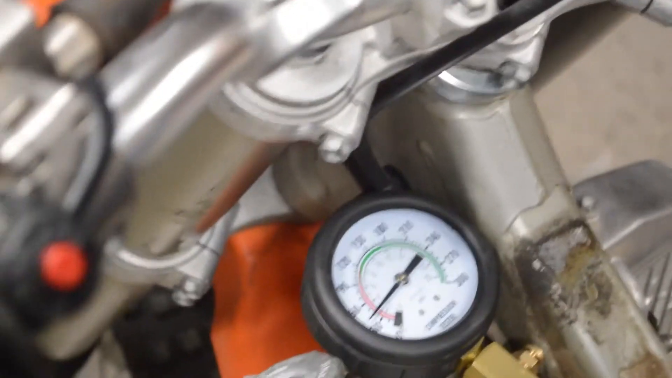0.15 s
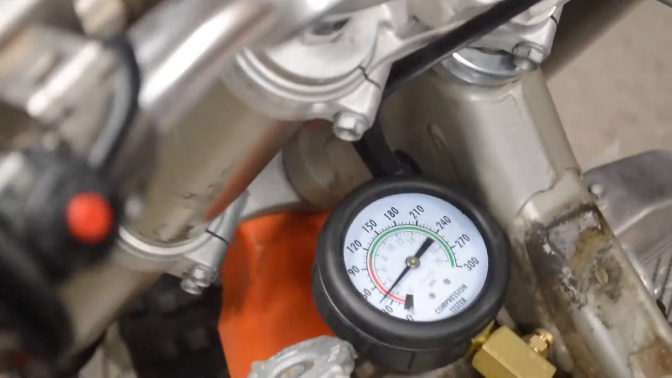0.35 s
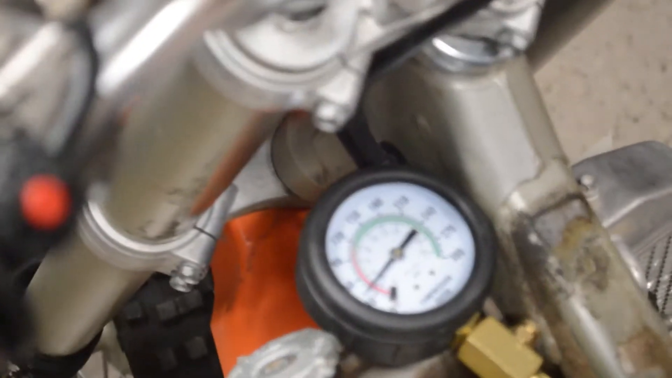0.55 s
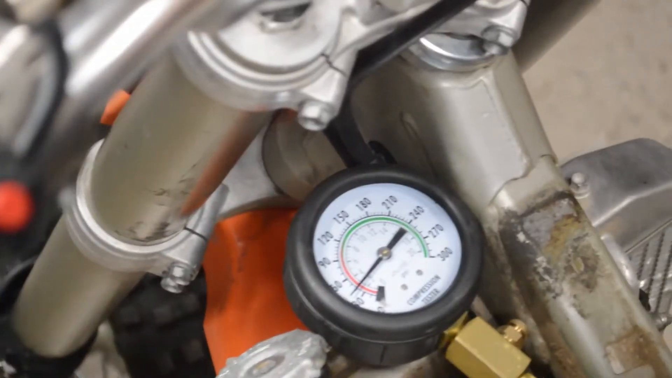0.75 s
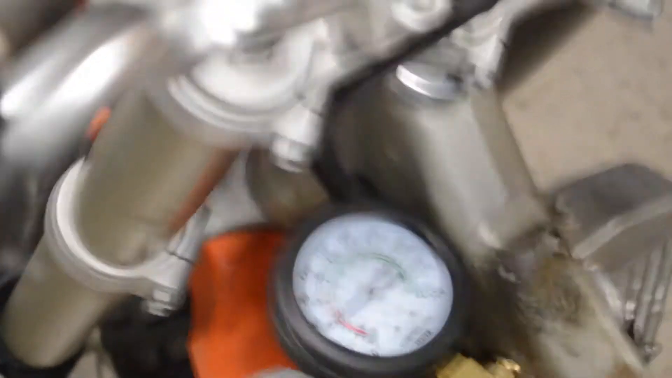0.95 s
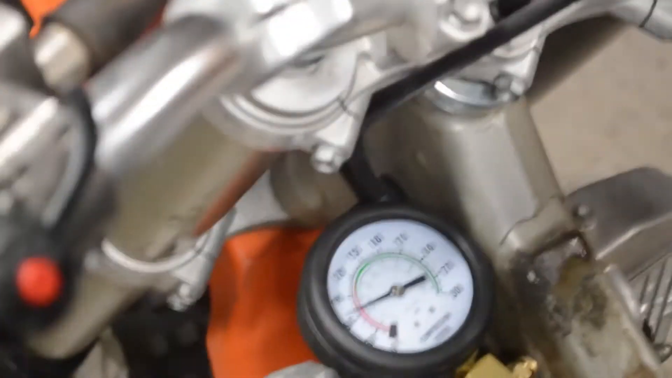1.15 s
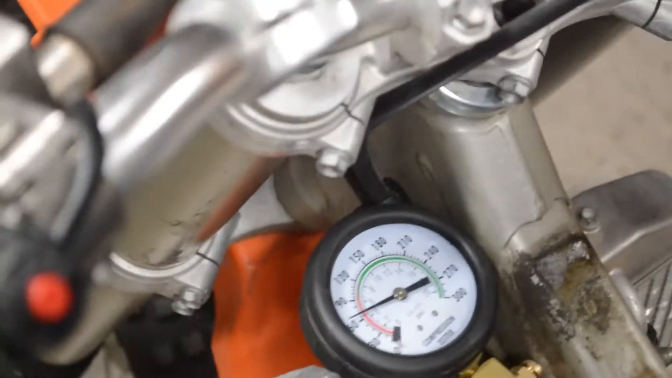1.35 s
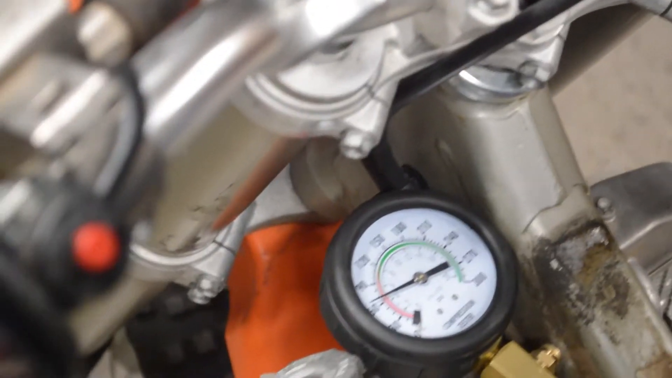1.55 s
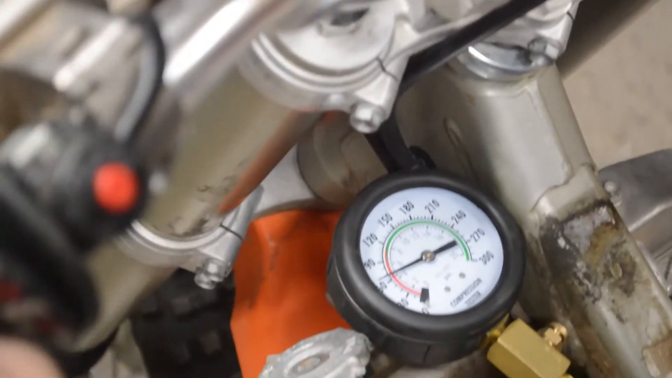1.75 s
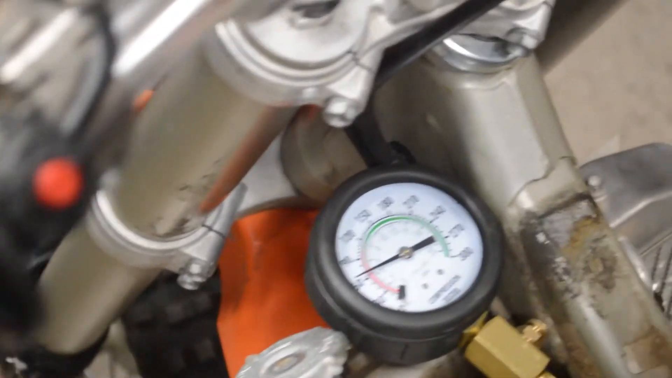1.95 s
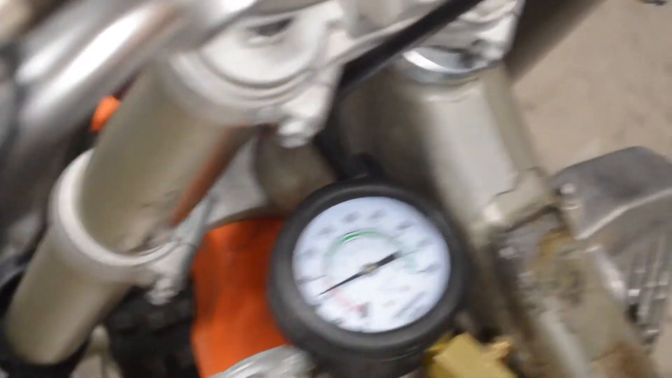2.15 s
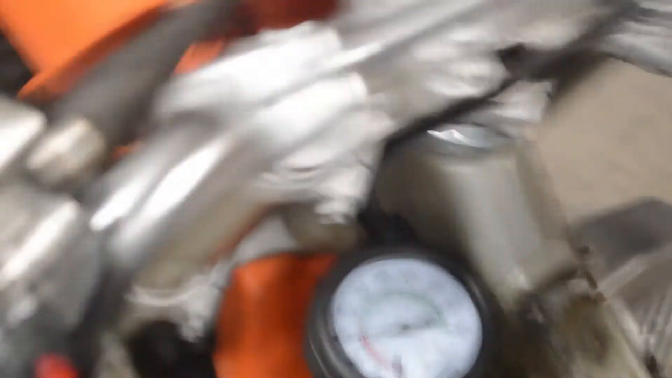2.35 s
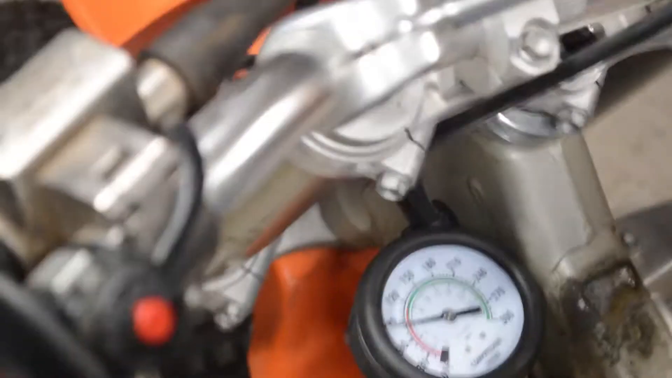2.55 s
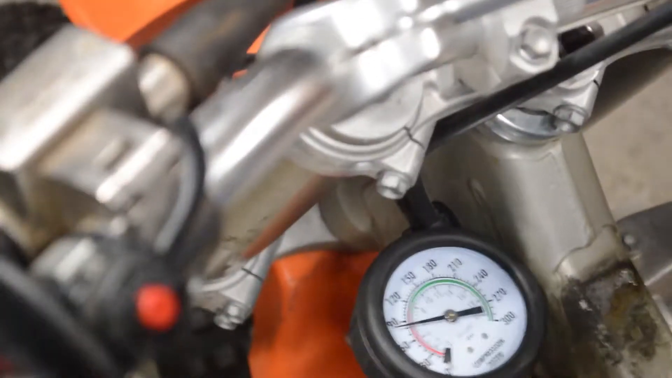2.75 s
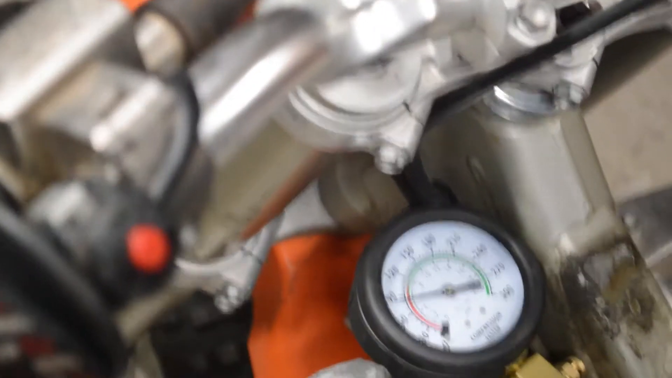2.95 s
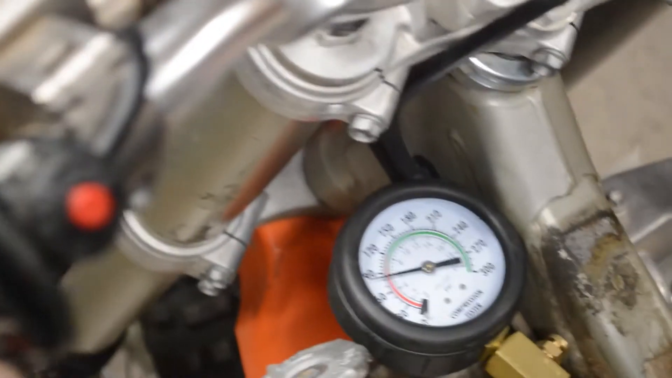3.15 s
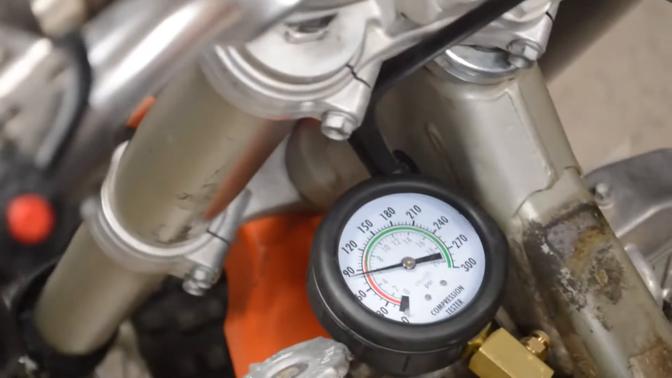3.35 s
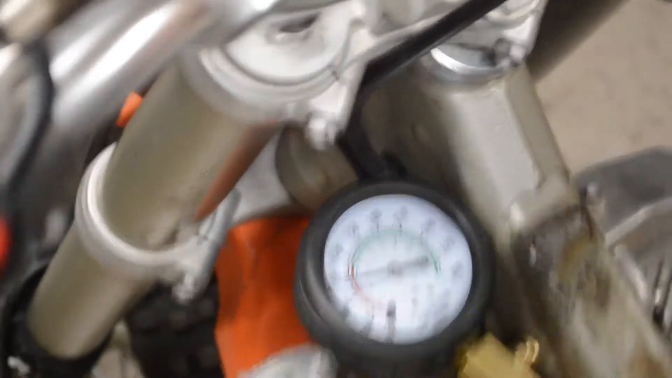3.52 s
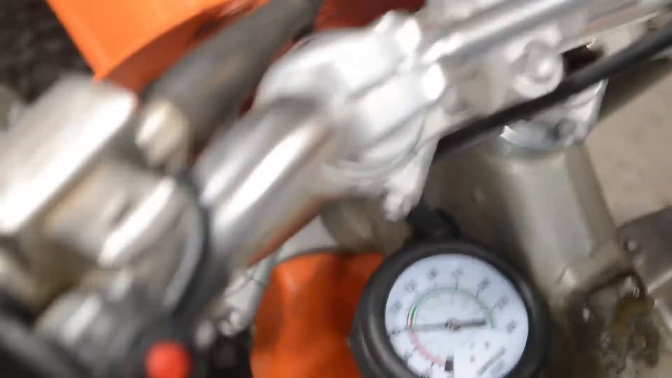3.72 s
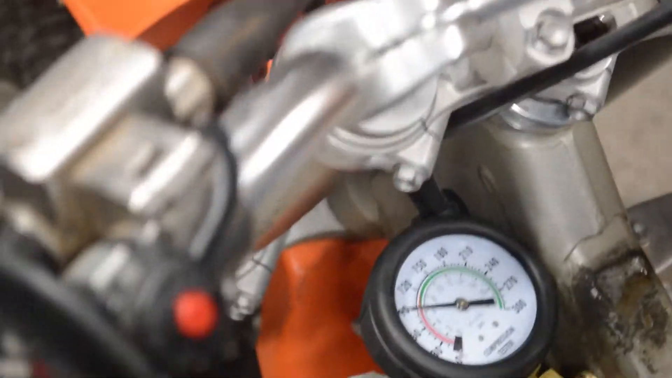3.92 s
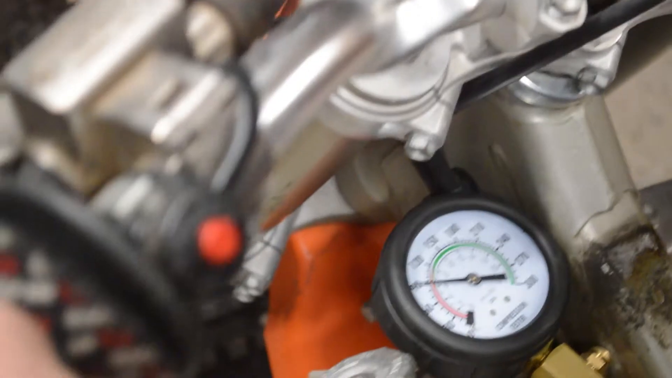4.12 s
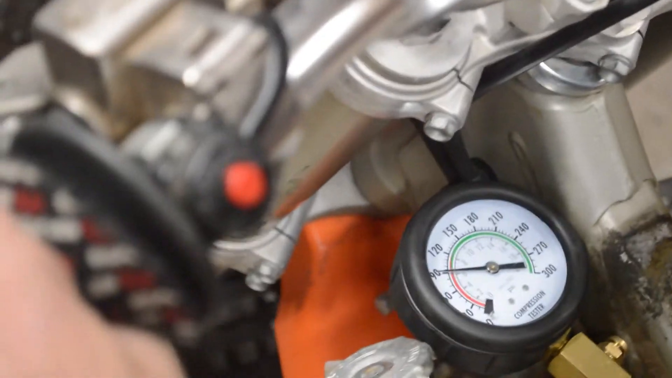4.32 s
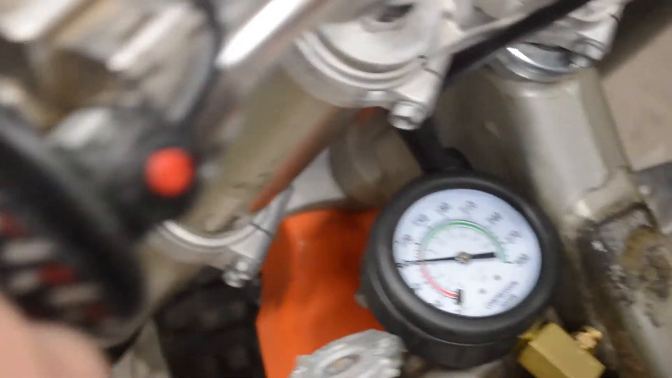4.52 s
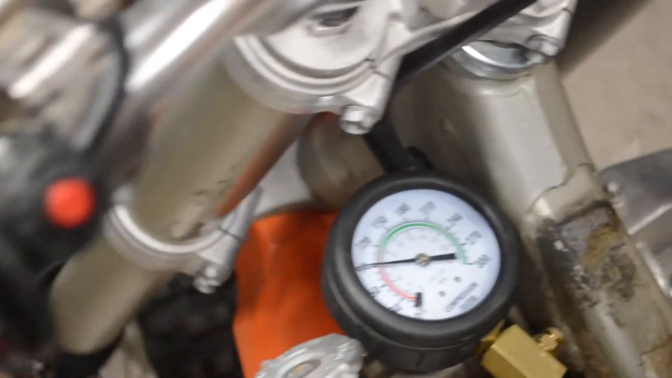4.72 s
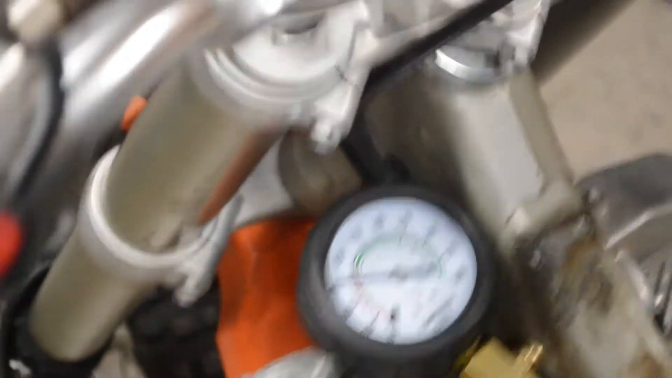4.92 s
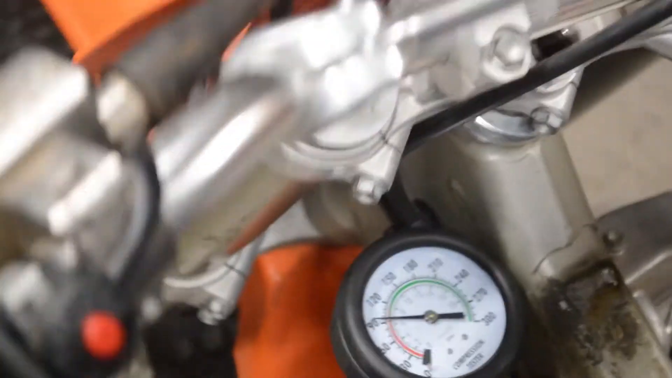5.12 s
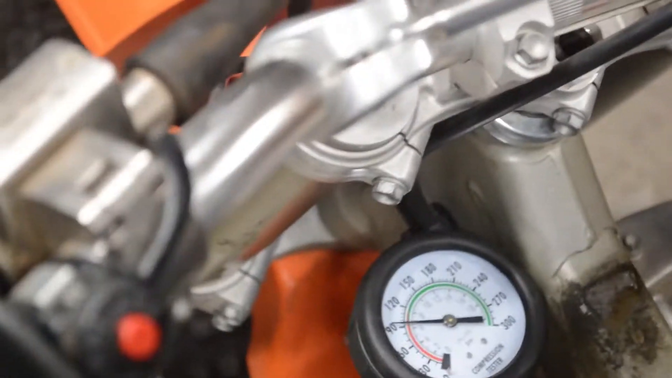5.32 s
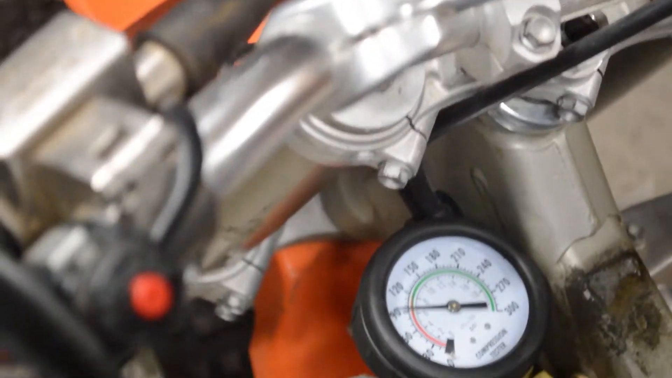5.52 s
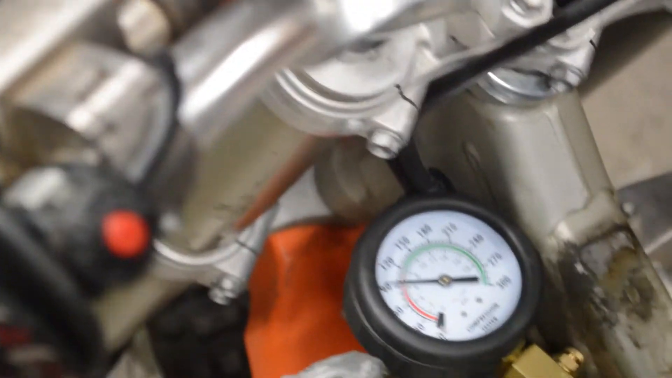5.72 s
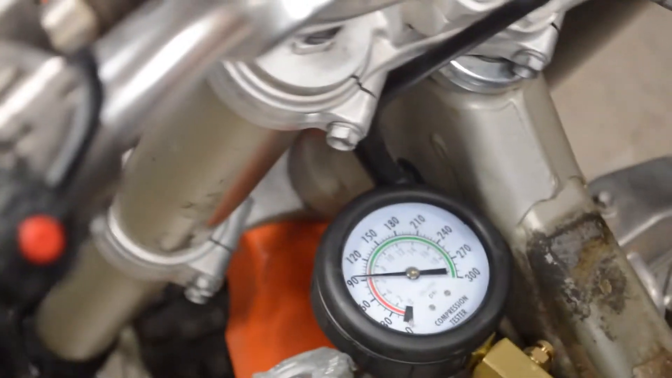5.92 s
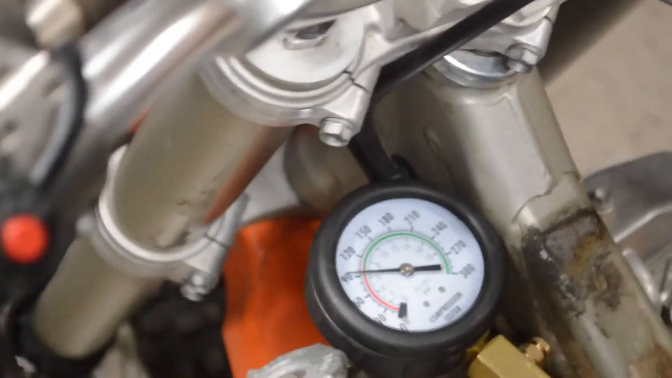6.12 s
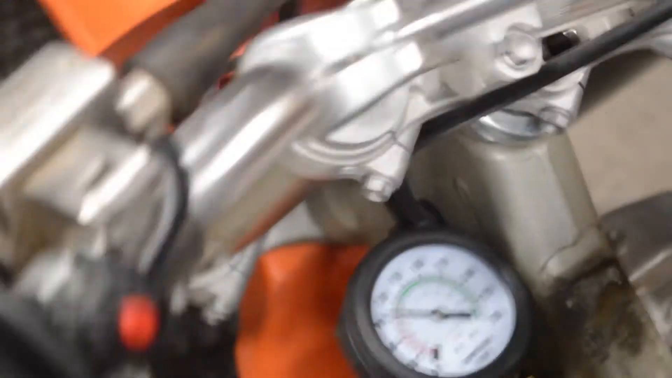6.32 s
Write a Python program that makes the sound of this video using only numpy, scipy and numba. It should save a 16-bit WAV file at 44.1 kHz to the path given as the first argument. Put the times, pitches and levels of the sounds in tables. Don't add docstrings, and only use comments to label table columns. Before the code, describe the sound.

Repeated kick-start attempts very close up: lever clack, gear whirr, quick ringing pipe puffs slowing to nothing, with metal jingles and boot shuffles between.

```python
import sys
import numpy as np
from scipy import signal
from scipy.fft import rfft, irfft
from scipy.io import wavfile
from scipy.ndimage import uniform_filter1d
from numba import njit

SR = 44100
rng = np.random.default_rng(int(sys.argv[2]) if len(sys.argv) > 2 else 0)


def transcribe(signal):
    frames = np.atleast_2d(signal).T
    limited = np.clip(frames, -1, 1)
    pcm = np.round(limited * 32767).astype(np.int16)
    wavfile.write(sys.argv[1], SR, pcm)


def gain_from_db(level_db):
    decades = np.asarray(level_db, float) / 20
    return 10 ** decades


N = 285327
T = np.arange(N) / SR

# bite_s (lever catches), bite_db, whirr_db (gears), bottom_s (boom peaks; never reached in the #
# last), boom_db
KICKS = [
    (-.29, -28, -35.5, 0.0, -43),
    (0.9361, -32.5, -37, 1.4, -51.5),
    (2.2797, -27, -37, 2.5, -35),
    (3.5727, -30.5, -35.5, 3.5, -49),
    (4.9362, -31.5, -36, 5.0, -61),
    (6.166, -37.5, -38.5, 7, -63),
]
# bite_db (whirr at the bite), stamp_db, stamp_after_s
BITES = [
    (-9.5, 2.5, .026),
    (-5.5, -2.5, 0.043),
    (-5.5, 5.5, 0.021),
    (-7.5, 6.5, 0.03),
    (-11, 2, .026),
    (-9.5, -3.5, 0.047),
]
# first_puff_s, first_turn_s, slowed_turns (already), drag (per turn squared)
RUNS = [
    (-.2324, .051, .05, .108),
    (.999, .0465, .086, .1063),
    (2.335, .0498, .047, .1062),
    (3.6301, .0481, .478, .0914),
    (4.986, .0387, 1.902, .0991),
    (6.242, .0287, 5.0, .0247),
]
# pitch_hz, width_hz, level_db
TRINKETS = [(5650, 160, -15), (8950, 110, -5), (9300, 160, -7), (12400, 110, -1), (12680, 130, -1),
            (14250, 300, -17)]


def level(x, db):
    return x * gain_from_db(db) / np.sqrt(np.mean(x ** 2))


@njit
def svf(x, hz, width):
    y, b, l = np.empty(len(x)), 0., 0.
    g, k = np.tan(np.pi * hz / SR), width / hz
    for i in range(len(x)):
        v = (b + g * (x[i] - l)) / (1 + g * (g + k))
        b, l, y[i] = 2 * v - b, l + 2 * g * v, k * v
    return y


def body(x, resonances):
    return sum((-1) ** k * gain_from_db(db) * svf(x + 1e-18, 1. * hz, 1. * width)
               for k, (hz, width, db) in enumerate(resonances))


def modes(table, t):
    return sum(size * np.sin(2 * np.pi * hz * t) * gain_from_db(-60 * t / t60) for hz, t60, size in table)


def colour(x, points):
    hz, db = np.transpose(points)
    f = np.arange(N // 2 + 1) * SR / N + 1
    return level(irfft(rfft(x) * gain_from_db(np.interp(np.log(f), np.log(hz), db)), N), 0)


def track(tables):
    out = np.zeros(N)
    for rows in tables:
        rows = np.array(rows)
        out += gain_from_db(np.interp(T, rows[:, 0], rows[:, 1], left=-150, right=-150))
    return uniform_filter1d(out, size=200)


def grains(rate, spread_db):
    size = gain_from_db(np.minimum(spread_db * rng.exponential(size=N), 8))
    return rng.standard_normal(N) * np.where(rng.random(N) < rate / SR, size * 2, 1)


def walk(rate):
    k = int(SR / rate)
    steps = np.repeat(rng.standard_normal(N // k + 1), k)
    return 1.3 * uniform_filter1d(uniform_filter1d(steps, k), k)[:N]


def add(out, s, burst):
    i = int(s * SR)
    out[i:i + len(burst)] += burst[:len(out) - i]


def strokes():
    turns = (7, 7, 7, 5, 6, 4)
    puff_db = (-9.5, -10.5, -11, -10, -10.5, -10)
    loss_db, loss_power = 8, 2.31
    rows = []
    for (s, turn_s, slowed, drag), db, count in zip(RUNS, puff_db, turns):
        turn_lengths = turn_s * (1 + drag * (slowed + np.arange(count - 1)) ** 2)
        gaps = np.r_[0, turn_lengths]
        rows += zip(s + np.cumsum(gaps), db - loss_db * (10 * gaps) ** loss_power)
    return rows


def exhaust():
    # pitch_hz, t60_s, signed_size
    pipe = [(192, 0.5, -0.13), (207, 0.25, 0.17), (243, 0.12, -0.8), (258, 0.5, 0.18), (324, 0.12, 0.59),
            (339, 0.5, 0.64), (354, 0.5, 0.92), (375, 0.5, -0.46), (390, 0.5, -0.19), (414, 0.25, -0.64),
            (431, 0.22, -0.85), (465, 0.12, -0.58), (480, 0.3, 0.33), (496, 0.25, 0.38), (528, 0.5, 0.09),
            (543, 0.5, 0.1), (633, 0.25, -0.15), (684, 0.5, -0.14), (702, 0.18, 0.26), (735, 0.12, -0.21)]
    # pitch_hz, t60_s, signed_size
    chamber = [(151, 0.1, 0.042), (291.2, 0.23, 0.75), (406.5, 0.17, 0.56), (570.3, 0.1, 0.87),
               (662.5, 0.29, 0.54), (812, 0.31, -0.21), (860.4, 0.25, 0.29), (946, 0.029, -0.55),
               (1058, 0.22, 0.069), (1170, 0.13, -0.088)]
    # pitch_hz, level_db (per Hz)
    puff_tail = [(130, -52), (205, -22), (248, -11.5), (311, -14), (354, -3.5), (400, -5), (494, -2),
                 (592, -17.5), (668, -5.5), (746, -14), (1290, -32), (2500, -33.5), (3250, -72),
                 (5500, -120)]
    push, other, air = np.zeros((3, N + SR))
    for k, (s, db) in enumerate(strokes()):
        length = int(np.clip(.0004 - .00007 * (db + 14), .0003, .003) * SR)
        slug = np.hanning(length + 2)
        slug = gain_from_db(db) * slug / slug.sum()
        start_s = 1 + s - length / SR / 2
        add(push, start_s, slug)
        add(other, start_s, np.sin(2.4 * k + 1) * slug)
        add(air, 1 + s, gain_from_db(db) * np.exp(-T[:SR // 2] / 0.063))
    t = T[:SR]
    ring = (modes(pipe[2:], t) * np.exp(-(t / .11) ** 3) + modes(chamber, t)) / 4
    pop = 0.22 * np.sin(2 * np.pi * 380 * t) * np.exp(-t / 0.019)
    tails = colour(rng.standard_normal(N), puff_tail)[:2 * SR].reshape(2, SR)
    blur, drift = tails * gain_from_db(-8.5 - 60 * t / 0.46) * (1 - np.exp(-(t / 0.048) ** 2))
    detuned = [(hz * 1.025, 0.74 * t60, size) for hz, t60, size in pipe[2:] + chamber[1:5]]
    shifted = modes(detuned, t) * np.exp(-(t / 0.13) ** 2) / 4
    turbulence = gain_from_db(-43) * air * rng.standard_normal(N + SR)
    same = signal.fftconvolve(push + turbulence, ring + pop + gain_from_db(-1.0) * blur)
    varied = signal.fftconvolve(other, 0.47 * drift + 0.28 * shifted)
    return (same + varied)[SR:N + SR]


def chuffs():
    # pitch_hz, t60_s, signed_size
    crankcase = [(110, 0.061, 0.2), (147.4, .12, 0.66), (200.7, 0.17, -1.06), (226.6, 0.2, 0.54)]
    run_db = (3.5, 4.5, 2.5, -18, 4, -8)
    out, t = np.zeros(N), T[:12000]
    thump = modes(crankcase, t) * np.minimum(t / 0.0058, 1)
    for s, db in strokes():
        if s > 0:
            run = sum(s >= row[0] for row in RUNS) - 1
            add(out, s, gain_from_db(-36.5 + 0.41 * db + run_db[run]) * thump)
    return out


def slaps():
    # pitch_hz, t60_s, size
    fins = [(1137, 0.04, 1.1), (1273, 0.03, 0.15), (1720, 0.028, 0.33), (2066, 0.03, 0.15)]
    # start_s, peak_db, pitch_factor
    loose_knocks = [(.0553, -29, 0.95), (0.77, -41, 1.16), (1.4, -37, 1.2), (1.1, -35, 1.15),
                    (2.4, -34, 1.1), (5.212, -24.5, 1.13), (.003, -36, 1.2), (0.06, -43, 0.96),
                    (1.297, -32.5, 1.0), (2.37, -29, 1.5), (2.498, -34, 1.1), (2.547, -30, 1.02),
                    (2.9, -34, 0.78), (2.886, -58, 0.61), (3.111, -50, 0.22), (3.699, -30, 1.47),
                    (3.832, -35, 1.1), (3.846, -33, 1.5), (3.861, -36, 0.96), (3.9135, -26, 1.02),
                    (3.815, -27, 1), (1.165, -27, 0.8), (5.118, -27, 0.75), (3.599, -39, 0.98),
                    (3.932, -45, 1.4), (5.147, -40, 2.2), (5.232, -49, 0.83), (5.075, -41, 1.5),
                    (2.412, -34, 1.3), (1.3935, -32.5, 0.256), (0.52, -39, 0.29), (0.48, -44, .27),
                    (6.13, -62, 1.1), (6.375, -36, 0.45)]
    # pitch_hz, t60_s, size
    arm = [(800, 0.33, 0.55), (920, 0.4, 0.66), (1285, .15, 0.46), (1720, 0.44, 0.28), (2230, 0.28, 0.26),
           (2300, 0.3, 0.21), (2640, 0.2, 0.15), (3340, 0.1, 0.23)]
    # start_s, peak_db, lean_db (toward high tones, per octave)
    arm_blows = [(.657, -63, 2), (2.083, -63.5, -9), (3.98, -58, 1), (4.43, -70, -4), (4.51, -75, 0),
                 (4.553, -70, 1), (4.692, -63, 2), (4.75, -66, -1), (4.921, -64.5, 12), (5.721, -71, 5),
                 (5.965, -64, -4)]
    out, t = np.zeros(N), T[:SR // 2]
    rows = [(s + 0.000963, db - 21, 1 + 0.063 * np.sin(2.1 * k))
            for k, (s, db) in enumerate(strokes()) if s > 0]
    for s, db, pitch in rows + list(loose_knocks):
        pitched = [(hz * pitch, t60, size) for hz, t60, size in fins]
        add(out, s, gain_from_db(db) * modes(pitched, t[:5000]) / 2)
    chatter = gain_from_db(5 * walk(50))
    for s, db, lean_db in arm_blows:
        leaned = [(hz, t60, size * gain_from_db(lean_db * np.log2(hz / 1000))) for hz, t60, size in arm]
        add(out, s, chatter[int(s * SR):][:len(t)] * gain_from_db(db) * modes(leaned, t))
    return out


def spin():
    coast = (63.4, 65.2, 57, 73.3, 56, 60)
    drive_s, drive_loss_db = 0.22, 10
    curves = []
    for (bite, _, db, _, _), run, (bite_db, _, _), coast_db in zip(KICKS, RUNS, BITES, coast):
        puff, driven_db = run[0], db - drive_loss_db
        curves.append([(bite - .002, db - 16.5), (bite + 0.0034, db + bite_db),
                       (puff - .005, db + bite_db / 2), (puff + .005, db),
                       (puff + drive_s, driven_db), (puff + drive_s + 1, driven_db - coast_db)])
    return track(curves)


def beat():
    out = np.ones(N)
    for s, _ in strokes():
        if s > 0:
            add(out, s, gain_from_db(-10) * np.exp(-T[:8000] / 0.019))
    return out


def sag():
    rise_db, drop_db, drop_s, fade_db_per_s = -10, 15.5, 0.11, 55
    return track([[(bite, db + 2 * rise_db), (run[0], db + rise_db), (s, db), (s + drop_s, db - drop_db),
                   (s + 1, db - drop_db - fade_db_per_s)]
                  for (bite, _, _, s, db), run in zip(KICKS, RUNS)])


def gears():
    # pitch_hz, level_db (per Hz)
    gear_spectrum = [(590, 4.5), (1000, 4), (1790, -16), (2330, -5), (5310, -13), (7350, -21.5),
                     (7980, -21), (10300, -25), (12500, -32.5), (16000, -33.5)]
    whirr = colour(grains(900, 12.0), gear_spectrum) * gain_from_db(walk(40))
    whirr = whirr / np.std(svf(whirr, 4500., 5500.))
    boom = level(svf(svf(rng.standard_normal(N), 65.0, 15.0), 58.0, 39.0), 0)
    return gain_from_db(-7.5) * beat() * spin() * whirr + gain_from_db(-2.0) * sag() * boom


def clicks():
    # start_s, peak_db, pitch_hz, top_db
    ratchet = [(0.0947, -41, 7000, -13), (0.3331, -54, 4370, -27), (0.4828, -51, 2960, -11.5),
               (0.9178, -40, 6000, -12), (0.9375, -29, 5100, -29), (5.0135, -29, 6200, -12),
               (5.028, -23, 3800, -20), (5.078, -37, 6100, -12), (6.455, -37, 5000, -20),
               (6.168, -34, 5700, -20), (2.516, -33, 2000, -25), (1.0224, -30, 6300, 1),
               (1.0468, -23, 3210, -27), (1.0994, -44, 3200, -26), (2.2423, -47, 6500, -20),
               (2.3276, -29, 6500, -5), (2.3585, -27.5, 5570, -2), (2.4696, -32.5, 5560, -15),
               (2.6165, -36, 3500, -3), (2.7494, -49, 3000, -9), (2.8833, -50, 4050, -22),
               (3.1487, -51.5, 3410, -31), (3.2066, -43, 6070, -30.5), (3.5079, -53, 5640, -9),
               (3.5578, -43, 5000, -31), (3.6541, -23, 5360, -23), (3.9235, -32.5, 3670, -21),
               (3.9799, -30, 4500, -42), (4.0994, -60, 3770, -25), (4.2882, -58, 4700, -29),
               (4.8978, -49, 3700, -22), (5.677, -49, 4400, -15), (5.7209, -40.5, 4080, -6),
               (5.7586, -47, 4300, -28), (6.19, -34.5, 3070, -23), (6.2452, -38, 3000, -16),
               (6.2642, -24.5, 5430, -20)]
    # start_s, peak_db
    taps = [(.8245, -62), (.8974, -47), (.9966, -26), (1.8856, -50), (1.939, -56), (2.1969, -45),
            (2.4404, -39.5), (.437, -56), (4.3151, -62), (4.6917, -63.5), (4.9202, -48), (4.9826, -48),
            (5.9773, -54), (6.4068, -38)]
    # start_s, peak_db
    ticks = [(.6145, -63), (.628, -46), (0.705, -49), (.8545, -58), (1.8028, -53), (1.878, -52),
             (3.4205, -59), (4.8349, -59), (6.106, -59), (6.1295, -64)]
    # start_s, peak_db, pitch_hz
    snaps = [
        (3.6107, -33.5, 8900),
        (3.709, -16.5, 6700),
        (3.718, -26.5, 9000),
        (3.8866, -24, 7000),
        (4.102, -55, 9000),
    ]
    out, loose, t = np.zeros(N), np.zeros(N), T[:2000]
    rows = list(ratchet)
    rows += [(s, db, 2330, -23) for s, db in taps]
    rows += [(s, db, 8800, -14) for s, db in ticks]
    rows += [(s, db, 4140, -33.5) for s, db, *_ in KICKS[1:]]
    for (s, db, hz, top_db), noise in zip(rows, rng.standard_normal((len(rows), 2000))):
        crack = noise * np.exp(-t / .0005)
        ring = svf(noise * gain_from_db(-60 * t / 0.023), 1. * hz, 0.25 * hz)
        edge = svf(svf(crack, 1. * hz, 0.5 * hz), 6900.0, 9000.)
        edge += gain_from_db(top_db - 1) * svf(crack, 12500., 7200.0)
        add(out, s, gain_from_db(db) * (.5 * ring / np.abs(ring).max() + 0.11 * edge))
        add(loose, s, gain_from_db(db + top_db) * crack)
    for (s, db, hz), noise in zip(snaps, rng.standard_normal((len(snaps), 2000))):
        add(out, s, gain_from_db(db) * svf(noise * np.exp(-t / 0.00054), 1. * hz, 12000.0))
    return out + gain_from_db(14.0) * body(loose, TRINKETS)


def knocks():
    # start_s, peak_db, pitch_hz, scrape_db
    boot_knocks = [(0.656, -47.5, 920, -10), (0.829, -55.5, 596, 0), (.88, -52, 800, -15),
                   (2.898, -45, 970, -45), (4.75, -62, 950, -12), (0.896, -46, 534, 2.5),
                   (1.883, -49, 286, -4), (1.94, -47.5, 760, -4), (1.979, -52, 795, -28),
                   (2.081, -60, 250, 12.5), (2.193, -54.5, 234, 7), (3.043, -55, 510, -25),
                   (3.087, -51.5, 480, -9.5), (3.172, -55, 780, -18), (3.53, -55, 230, 0),
                   (4.422, -66, 930, 4.5), (4.508, -49.5, 504, -14), (4.621, -68, 80, -45),
                   (4.098, -64, 70, -30), (2.307, -27, 606, -2.5), (5.509, -52, 600, -18),
                   (1.803, -57, 700, -13.5), (0.66, -58, 70, -40), (2.2, -64, 60, -42),
                   (4.551, -56, 354, -4), (4.696, -58.5, 946, 4.5), (5.719, -54, 675, 4.5),
                   (5.965, -43, 735, -20), (5.983, -46, 436, -24), (6.127, -52, 830, -14),
                   (6.197, -28, 240, -39), (6.221, -48, 318, -27)]
    # start_s, peak_db
    thuds = [
        (0.656, -51),
        (0.719, -57),
        (2.079, -49.5),
        (3.149, -57),
        (4.747, -66),
        (5.551, -61),
        (5.706, -53),
        (5.965, -46.5),
        (6.019, -65),
    ]
    out, t = np.zeros(N), T[:12000]
    rows = [(s, db, hz, 0.29, scrape_db) for s, db, hz, scrape_db in boot_knocks]
    rows += [(s, db, 236, 0.31, -33) for s, db in thuds]
    for (s, db, *_), (_, stamp_db, late_s) in zip(KICKS[1:], BITES[1:]):
        rows += [(s + 0.0045, db, 435, .15, -4), (s + late_s, db + stamp_db, 373, .25, -30)]
    for (s, db, hz, t60, scrape_db), noise in zip(rows, rng.standard_normal((len(rows), 12000))):
        blow = (noise + 1.2 * np.exp(-t / .0004)) * gain_from_db(-60 * t / t60)
        ring = svf(svf(blow, 1. * hz, 90 + 0.17 * hz), 1. * hz, 100 + 0.73 * hz)
        scrape = svf(svf(blow, 530.0, 1000.0), 750.0, 2800.0)
        hit = ring / np.abs(ring).max() + gain_from_db(scrape_db) * scrape / np.abs(scrape).max()
        add(out, s, gain_from_db(db - 2) * hit)
    return out


def lever():
    # pitch_hz, width_hz, level_db
    rattle = [(2140, 350, 3), (3320, 2200, -7), (4300, 500, 0), (4660, 300, -15)]
    # start_s, peak_db, t60_s
    rattles = [
        (2.329, -33, 0.17),
        (3.978, -39, 0.53),
        (4.6917, -61, 0.55),
        (5.68, -56, 0.49),
        (5.9764, -63, 0.27),
    ]
    # pitch_hz, t60_s, size
    shaft = [(2280, .46, 0.53), (2380, .3, .5), (3350, .3, .5), (3620, 0.3, 0.67), (4420, 0.22, 0.67),
             (4470, .15, .7), (4560, 0.35, 0.61)]
    # start_s, level_db, lean_db (toward high tones, per octave), ring_share (of t60)
    clangs = [
        (2.329, -43, 12, 0.24),
        (3.98, -55, -4, 1.23),
        (5.721, -72, 6, 0.7),
        (5.78, -76, -8, 1.7),
        (5.965, -75, -10, 0.73),
    ]
    shake, clang, t = np.zeros(N), np.zeros(N), T[:SR // 2]
    for s, db, t60 in rattles:
        add(shake, s, gain_from_db(db - 60 * t / t60))
    for s, db, lean_db, share in clangs:
        leaned = [(hz, share * t60, size * gain_from_db(lean_db * np.log2(hz / 3300))) for hz, t60, size in shaft]
        add(clang, s, gain_from_db(db) * modes(leaned, t))
    steel = svf(body(rng.standard_normal(N), rattle), 3400., 3500.)
    return clang * gain_from_db(5 * walk(60)) + shake * level(steel, -13)


def jingle():
    # start_s, peak_db, t60_s
    jolts = [(.0199, -45, 0.072), (.1077, -44, 0.16), (.4923, -67, .2), (.5856, -60, 1), (.854, -50, 0.23),
             (.9193, -47, 0.25), (1.0246, -51, .2), (1.1762, -56, 0.26), (1.8028, -60, 0.26), (2.1, -61, 1),
             (2.4289, -45, 0.33), (2.7377, -59.5, 0.42), (3.2095, -56, 0.81), (3.4206, -48.5, 0.14),
             (3.6541, -46, 0.61), (4.6329, -66, 0.28), (4.8429, -55, 0.32), (5.014, -37.5, 0.37),
             (5.31, -65, 0.37), (5.681, -57, 0.21), (5.7224, -55, 0.28), (5.9743, -60.5, 1),
             (6.1295, -51.5, 0.54), (6.2647, -32.5, 0.085)]
    shake = gain_from_db(-25) * spin()
    stamps = [(s + 0.0257, db - 17, 0.16) for s, db, *_ in KICKS[1:]]
    for s, db, t60 in list(jolts) + stamps:
        add(shake, s, gain_from_db(db - 10 - 60 * T[:SR // 2] / t60))
    parts = sum(body(grains(200, 4.0) * gain_from_db(4.5 * walk(25)), [trinket]) for trinket in TRINKETS)
    return shake * level(parts, 0)


def hisses():
    starts = (1.015, 2.735, 3.205, 5.012, 5.305, 5.675, 5.97, 6.26)
    levels = (-50, -65, -76, -47, -63, -64, -68, -54)
    hz, width_hz = 8240., 7100.
    flow, t = np.zeros(N), T[:8000] / 0.018
    for s, db in zip(starts, levels):
        add(flow, s, gain_from_db(db) * 2 * t * np.exp(-t))
    return flow * level(svf(svf(rng.standard_normal(N), hz, width_hz), hz, 2 * width_hz), 0)


def drags():
    # start_s, length_s, level_db, pitch_hz
    scrapes = [(0.31, 0.22, -64, 900), (1.57, 0.22, -60, 800), (1.86, 0.18, -64, 820),
               (1.878, 0.082, -70, 2600), (2.205, 0.11, -66, 3200), (2.895, 0.22, -70, 910),
               (3.145, 0.18, -74.5, 3150), (3.203, 0.15, -70, 5500), (3.37, 0.074, -77, 2800),
               (3.535, 0.047, -65, 3400), (3.61, 0.014, -40.5, 6000), (0.868, 0.047, -60, 500),
               (5.29, 0.13, -62, 1850), (4.432, 0.15, -73.5, 2180), (4.692, .1, -76, 2960),
               (5.45, 0.18, -60, 860), (5.683, 0.13, -65.5, 4100), (5.674, 0.091, -65, 890),
               (5.776, 0.15, -74, 2900), (5.973, 0.082, -73, 4140)]
    # start_s, peak_db, pitch_hz, t60_s
    wobbles = [(0.14, -65.5, 51, 1.9), (1.2, -58, 64.9, 1.8), (2.18, -57, 60, 0.66), (2.8, -64, 54, 1.4),
               (3.66, -37.5, 68, 0.85), (4.0, -60.5, 58, 1.8), (4.6, -70, 55, 1.1), (2.2, -64.5, 53, 1.3),
               (0.012, -39, 46, 0.31), (5.3, -61, 59.6, 0.77)]
    out, grit, t = np.zeros(N), grains(400, 4.0) * gain_from_db(2 * walk(45)), T[:SR]
    for s, length, db, hz in scrapes:
        u = T[:int(length * SR)] / length
        width = 0.31 * hz
        scrape = svf(svf(grit[int(s * SR):][:len(u)], 1. * hz, width), 1. * hz, 2 * width)
        edges = np.clip(np.minimum(30 * u, 4 * (1 - u)), 0, 1)
        add(out, s, level(scrape, db) * gain_from_db(-9 * u) * edges)
    for s, db, hz, t60 in wobbles:
        add(out, s, gain_from_db(db) * modes([(hz, t60, 1)], t) * np.minimum(t / 0.054, 1) * (1 - t))
    return out


def shuffle():
    # time_s, level_db
    rests = [
        [(.33, -73.5), (.688, -60), (.802, -67.5), (.885, -60), (.95, -43)],
        [(1.6, -85), (1.75, -65.5), (2.05, -67.5), (2.29, -61)],
        [(2.95, -76), (3.144, -73), (3.22, -65.5), (3.58, -71.5)],
        [(4.25, -80.5), (4.536, -73.5), (4.95, -67.5)],
        [(5.55, -74.5), (5.91, -66.5), (5.978, -69.5), (6.12, -64.5), (6.18, -52)],
    ]
    # pitch_hz, level_db (per Hz)
    boot_spectrum = [(59, -28), (100, 1), (160, -12), (199, -4), (315, -8), (432, 8), (668, 1.5), (926, 6),
                     (1800, -17.5), (2340, -51), (3960, -120)]
    # pitch_hz, level_db (per Hz)
    grit_spectrum = [(880, -22), (1500, -8.5), (2300, -4.5), (4610, -6), (6530, -12), (9240, -15.5),
                     (10400, -22), (12000, -16), (15600, -43), (22000, -120)]
    boots = colour(grains(130, 3.35), boot_spectrum) * gain_from_db(2.0 * walk(22))
    grit = colour(grains(330, 3.3), grit_spectrum) * gain_from_db(walk(33))
    return track(rests) * (boots + gain_from_db(-2) * grit) * gain_from_db(-4)


def garage_air():
    # pitch_hz, level_db (per Hz)
    air_spectrum = [(15, -54.5), (25, -18.5), (68, -10), (149, -22), (291, 10), (463, -27), (648, -25),
                    (797, 8), (1480, -9), (4500, -13), (6460, -35), (12000, -44), (15600, -66.5),
                    (22000, -120)]
    # pitch_hz, level_db
    hum_tones = [(64.6, -84.5)]
    hum = sum(gain_from_db(db + 3 + 2.0 * walk(3)) * np.sin(2 * np.pi * hz * T) for hz, db in hum_tones)
    air = colour(rng.standard_normal(N), air_spectrum) * gain_from_db(2.0 * walk(5.2))
    return level(air, -77.5) + hum


@njit
def walls(x, lags, gain, damp):
    line, soft, out = np.zeros((8, 4096)), np.zeros(8), np.zeros(len(x))
    for i in range(len(x)):
        total = 0.
        for k in range(8):
            soft[k] += (1 - damp) * (gain[k] * line[k, (i - lags[k]) & 4095] - soft[k])
            total += soft[k]
            out[i] += soft[k] * (1 - 2 * (k % 2))
        for k in range(8):
            line[k, i & 4095] = x[i] + soft[k] - total / 4
    return out


def scene():
    engine = exhaust() + chuffs() + slaps() + gears()
    metal = clicks() + knocks() + lever() + jingle()
    near = engine + metal + hisses() + drags() + shuffle()
    t60_s, damp, echo_db = 0.6, 0.03, -21.5
    lags = rng.integers(500, 2600, size=8)
    echo = walls(near + 1e-18, lags, gain_from_db(-60 * lags / SR / t60_s), damp)
    return (near + gain_from_db(echo_db) * echo + garage_air())[None]


def low_pass(x):
    return signal.sosfilt(signal.butter(12, 15850, fs=SR, output="sos"), x)


def record(dry):
    input_limit, full_scale = 0.069, 0.074
    clipped = np.clip(dry, -input_limit, input_limit)
    top_cut = signal.ellip(8, .2, 40, 15900, fs=SR, output="sos")
    mix = np.clip(signal.sosfilt(top_cut, clipped), -full_scale, full_scale)
    return low_pass(mix)


dry = scene()
out = record(dry)
transcribe(out)
```